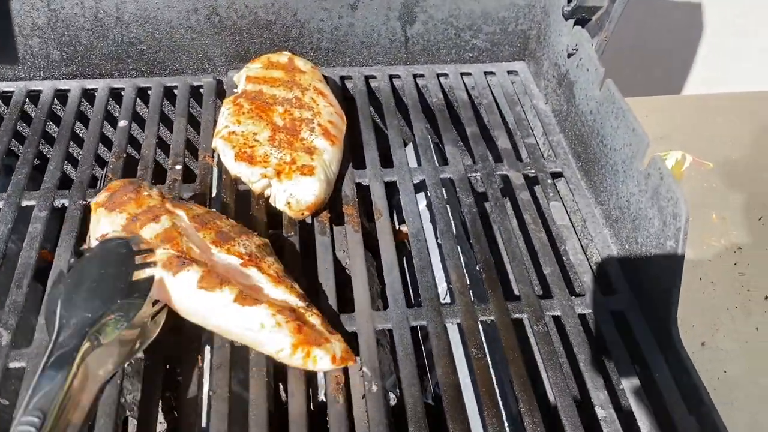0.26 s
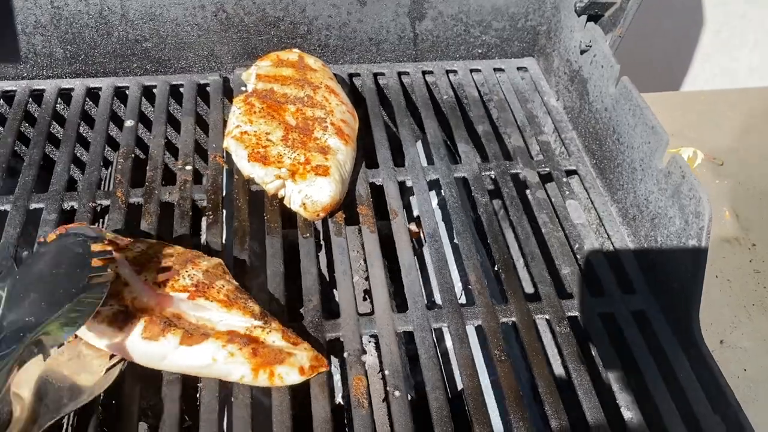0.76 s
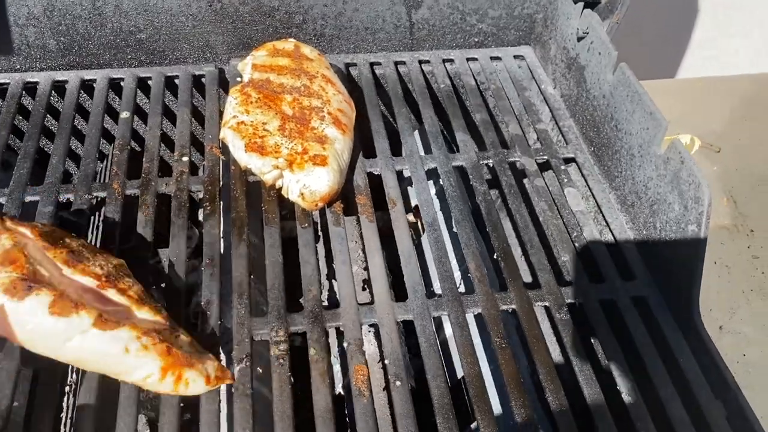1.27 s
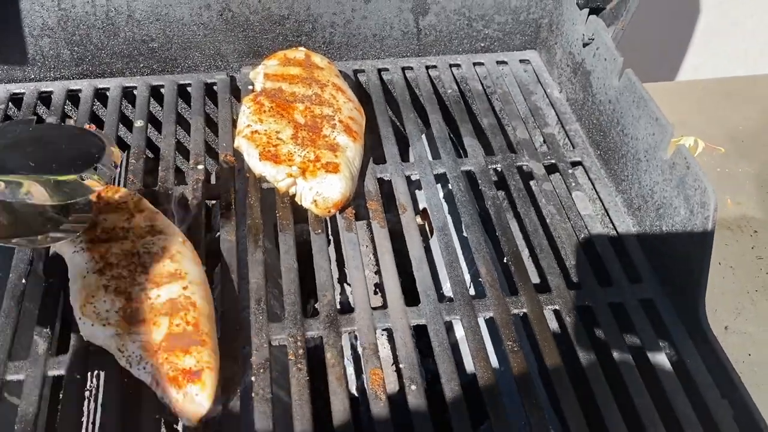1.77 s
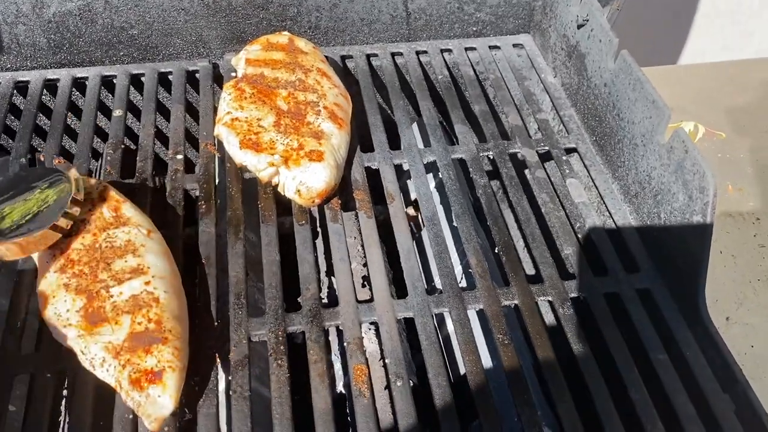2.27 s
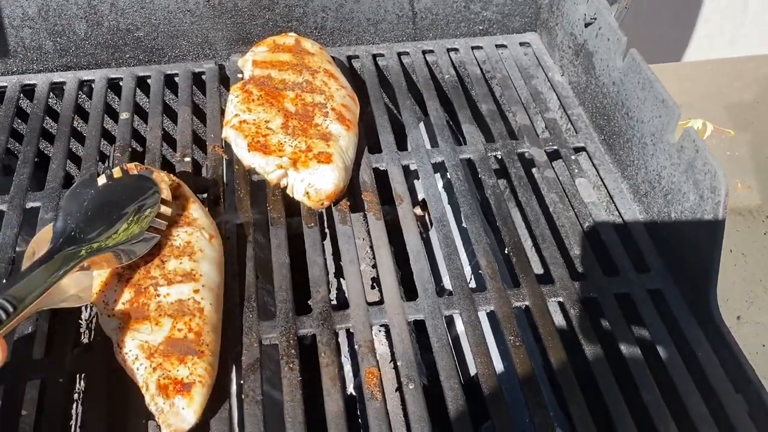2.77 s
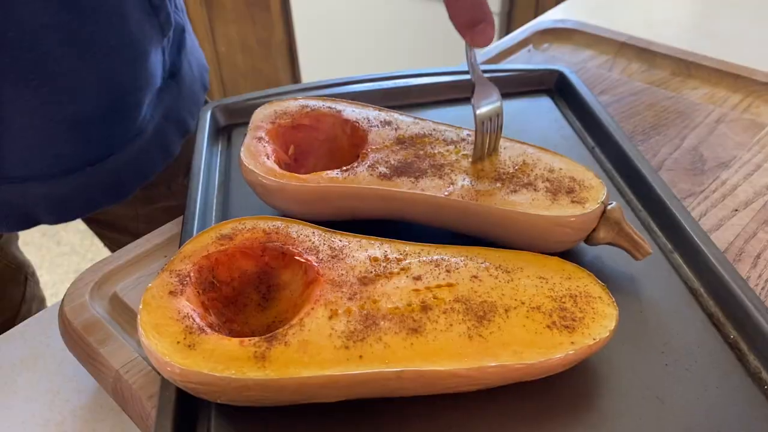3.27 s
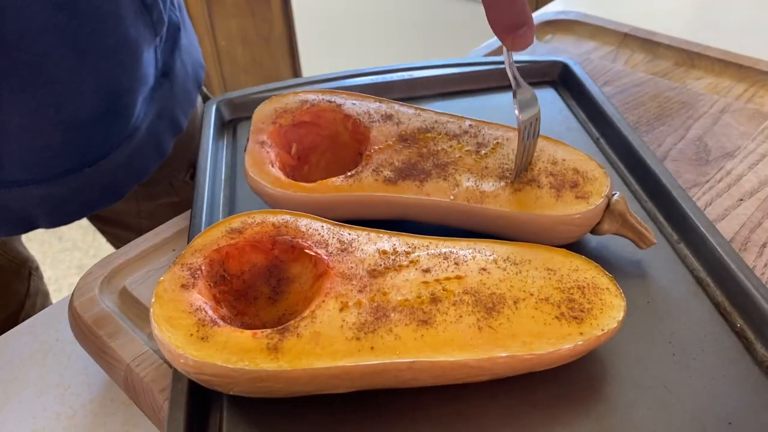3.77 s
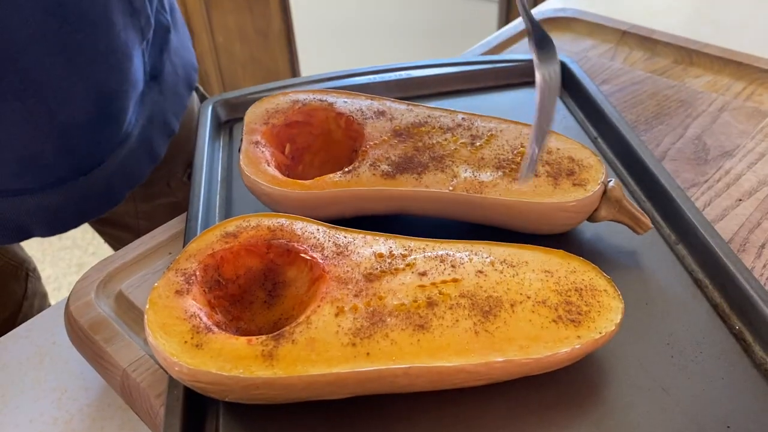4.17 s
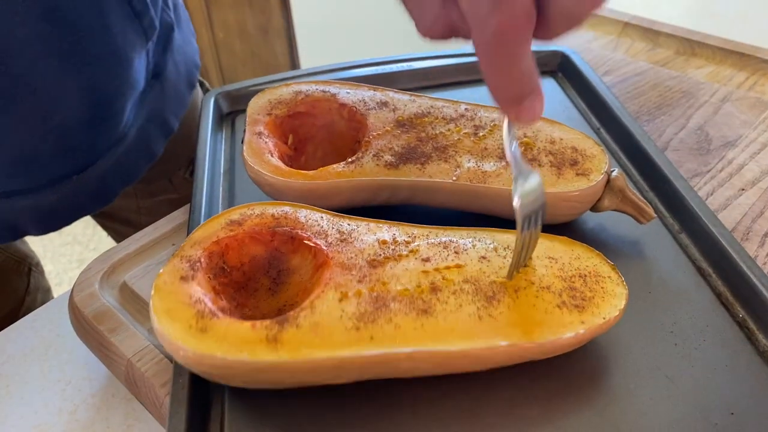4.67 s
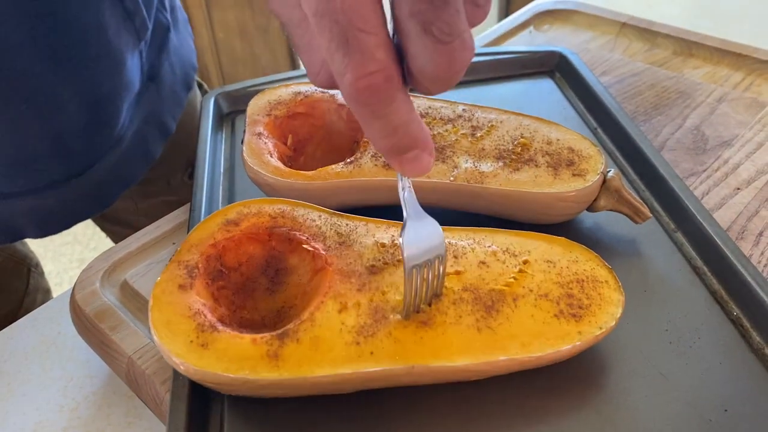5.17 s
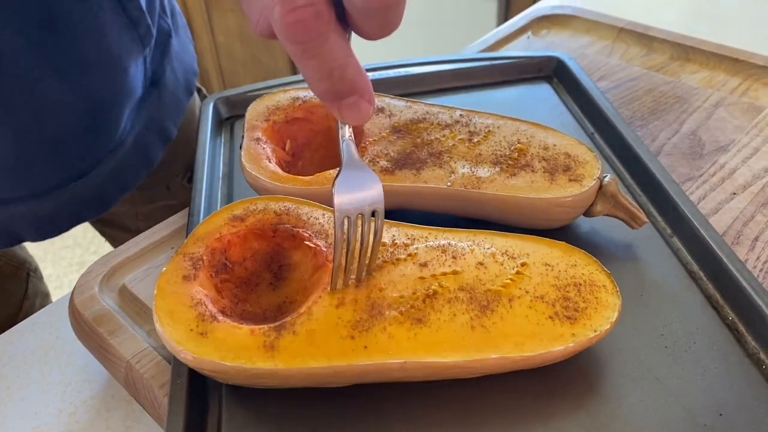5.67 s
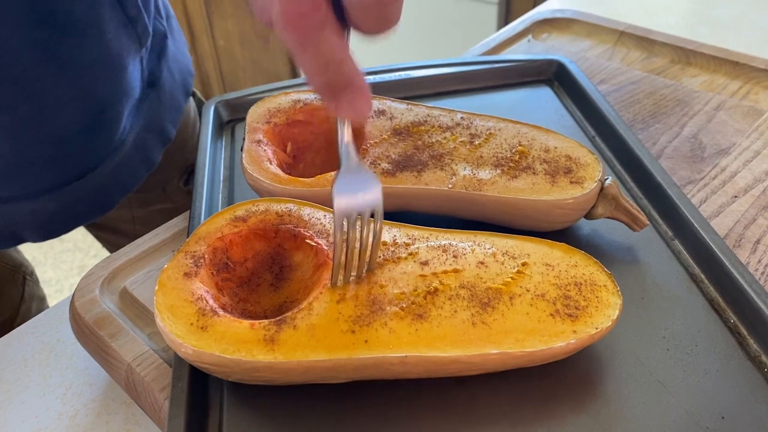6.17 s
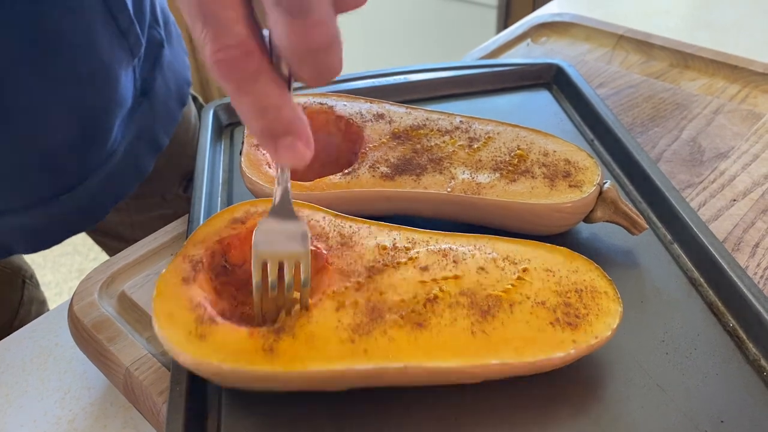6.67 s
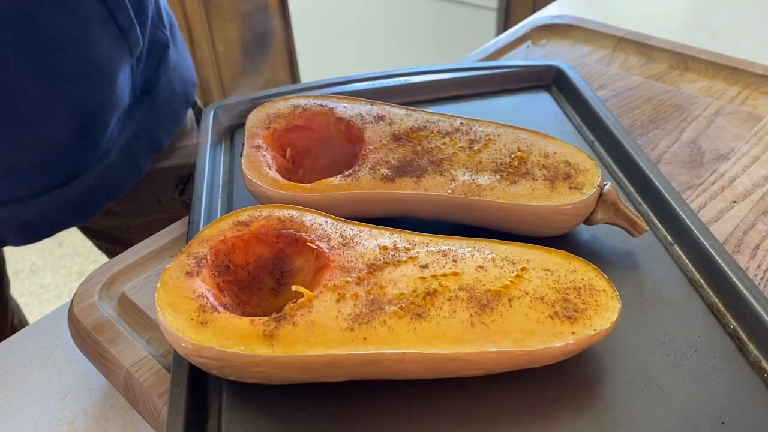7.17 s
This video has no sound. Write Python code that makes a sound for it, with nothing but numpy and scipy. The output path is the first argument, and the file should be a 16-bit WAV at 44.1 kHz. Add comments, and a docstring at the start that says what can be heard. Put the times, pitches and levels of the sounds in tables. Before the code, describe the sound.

For the first 3.3 seconds, chicken sizzles steadily on an outdoor gas grill, heard close in stereo. Fat spits in tiny ticks while the flame roars low and gives deep puffs, strongest between 0.6 and 1.1 seconds. Metal tongs knock the iron grate with short ringing clatters, loudest around 0.5, 2.1 and 3.2 seconds.

At 3.3 seconds the sound cuts to a much quieter kitchen with a soft low rumble and a faint fridge hum. A fork repeatedly pricks baked squash, making faint wet squelches, small sharp snaps and tiny juice pops. Dull thumps come through the board beneath at about 3.7, 5, 5.6 and 6.5 seconds. At 4.4 seconds the sheet pan slaps the wooden board once with a thump, the loudest kitchen sound. A very faint steel scrape comes near 7 seconds, then a thin, quiet hiss at the very end.

```python
"""Chicken sizzles on a gas grill outdoors: the flame roars low, fat spits, tongs knock the iron grate,
and drips make the flame puff. At about 3.3 seconds a hard cut leads to a quiet kitchen with a humming
fridge. A fork pricks baked squash on a sheet pan: wet flesh squelches, fibres snap, juice pops, the
board below thumps, and the pan slaps it once. Near the end come a faint scrape and a thin hiss.
Two microphone openings, close together, hear it all."""
import sys
import numpy as np
from scipy import signal
from scipy.fft import rfft, irfft, next_fast_len
from scipy.io import wavfile
from scipy.ndimage import uniform_filter1d, map_coordinates

SR = 44100
rng = np.random.default_rng(int(sys.argv[2]) if len(sys.argv) > 2 else 0)


def log_audio(samples):
    """Write samples as a 16-bit WAV file to the path given in sys.argv[1]."""
    # one column per channel
    frames = np.atleast_2d(samples).T
    # limit to full scale, then quantise
    limited = np.clip(frames, -1, 1)
    pcm = np.round(limited * 32767).astype(np.int16)
    wavfile.write(sys.argv[1], SR, pcm)


N = 326772
TIME = np.arange(N) / SR
CUT_S = 3.272  # the grill gives way to the kitchen

# The tone of sizzling fat and of the thin hiss. Each row: frequency in Hz, level in dB.
SIZZLE_TONE = [(300, -24.5), (500, -8.5), (1200, -7), (2200, -9), (3500, -5), (5000, -4.5), (6500, -6.5),
               (10000, -3), (12200, -8), (14000, -3.5), (15500, 0.5)]
# The fork sliding through wet flesh. Each row: start, peak and end in seconds, level in dB,
# then fizz and squeak in dB compared with that level.
FORK_STROKES = [(3.267, 3.268, 3.68, -77.5, -4, -15), (3.354, 3.385, 3.26, -77, 0, -10),
                (3.496, 3.5, 3.64, -83.5, -2, -13), (3.615, 3.636, 3.81, -77.5, -4, -10),
                (3.74, 3.77, 3.82, -82.5, 4, -13), (3.85, 3.91, 3.92, -79, 0, -17),
                (3.93, 3.95, 4.13, -79, -2, -17), (4.314, 4.338, 4.88, -74, -5.5, -14),
                (4.434, 4.49, 4.62, -79, -23, -15), (4.945, 4.976, 5.2, -77.5, -2.5, -12),
                (5.171, 5.215, 5.37, -72, -4, -12), (5.252, 5.284, 5.325, -61, -13, -10),
                (5.559, 5.562, 5.64, -70, -9, 4.5), (5.637, 5.696, 6.094, -90, -6, 1),
                (5.982, 6.121, 6.16, -73, -6, -17), (6.13, 6.16, 6.18, -70.5, -22, -1),
                (6.435, 6.465, 6.56, -78, -7, 2.5), (6.48, 6.514, 6.58, -74.5, -5, -8),
                (6.608, 6.662, 6.74, -74, 1, -8), (6.726, 6.79, 6.9, -89, -10, -5),
                (7.236, 7.245, 7.5, -74.5, -18, -10)]
# Thumps on the board. Each row: start in seconds, level in dB, pitch in Hz.
BOARD_THUMPS = [(3.664, -41, 112.7), (4.343, -40, 152.4), (4.434, -27, 164.8), (4.472, -25, 143),
                (4.541, -43, 111.7), (5.022, -46.5, 109.5), (5.035, -44.5, 72), (5.584, -39, 102.7),
                (5.659, -48, 137.4), (6.543, -43.5, 124.3), (7.244, -52, 241)]


def amp(db):
    """Turn decibels into a number to multiply by."""
    return 10 ** (np.asarray(db) / 20)


def unit(x):
    """Scale a signal so that its average strength (rms) is 1."""
    return x / np.sqrt(np.mean(x ** 2) + 1e-20)


def along(points, hz):
    """Read between rows of (frequency, value), with octaves evenly spaced."""
    freqs, values = np.transpose(points)
    return np.interp(np.log(hz + 1), np.log(freqs + 1), values)


def wobble(rate):
    """A smooth random curve through `rate` new values a second."""
    return map_coordinates(rng.standard_normal(int(N * rate / SR) + 4), [TIME * rate])


def filtered(x, response):
    """Change each frequency of x by what response(hz) gives."""
    size = next_fast_len(N + SR // 2)
    return irfft(rfft(x, size) * response(np.fft.rfftfreq(size, 1 / SR)), size)[..., :N]


def closed(tone):
    """Make a tone fall silent an octave beyond each end."""
    return [(tone[0][0] / 2, -70)] + tone + [(tone[-1][0] * 2, -70)]


def add(out, start, sound):
    """Mix a sound in at `start` seconds."""
    part = out[..., round(start * SR):][..., :sound.shape[-1]]
    part += sound[..., :part.shape[-1]]


def rush(tone, patchy_db, spiky=0):
    """Stereo noise of a given tone; patchy_db makes its bands flicker, spiky adds tiny bursts."""
    # How alike left and right are. Each row: frequency in Hz, likeness from 0 to 1.
    likeness = [(60, 0.94), (400, .93), (1000, 0.31), (2000, .45), (4000, 0.35), (6500, 0.9), (8400, 0.9),
                (12000, 1), (15000, 0.39)]
    bursts = np.exp(spiky * wobble(1500))
    bands = signal.stft(rng.standard_normal((2, N)) * bursts, nperseg=512)[2]
    patches = uniform_filter1d(rng.standard_normal(bands.shape[1:]), 6, axis=0)
    patches = uniform_filter1d(patches, 10, axis=1)
    pair = signal.istft(bands * amp(patchy_db * unit(patches)), nperseg=512)[1][:, :N]

    def colour(hz):
        width = np.arccos(np.clip(along(likeness, hz), 0, 1)) / 2
        return amp(along(tone, hz)) * [np.cos(width), np.sin(width)]

    mid, side = filtered(pair, colour)
    return unit(np.array([mid + side, mid - side]))


def ring(notes, rise_s, rough):
    """Unsteady notes swell and fade. Here and below, a fade time is the time to drop by 60 dB."""
    t = TIME[:SR // 2]
    out = 0
    for hz, db, fade_s in notes:
        drift = np.cumsum(rng.standard_normal(len(t))) * rough
        level = amp(db + rng.normal(0, 1.6) - 60 * t / fade_s)
        out = out + level * np.sin(2 * np.pi * hz * t + drift)
    return out * (1 - np.exp(-t / max(rise_s, 0.0005)))


def struck(notes, favoured_hz, fall_db):
    """Where a blow lands favours notes near one pitch; the rest lose fall_db for each octave away."""
    return [(hz, db - fall_db * abs(np.log2(hz / favoured_hz)), fade_s) for hz, db, fade_s in notes]


def burst(tone, fades):
    """A burst of stereo noise in which each band dies at its own speed."""
    hz, t, bands = signal.stft(rng.standard_normal((2, SR // 2)), SR, nperseg=128)
    bands[1] = 0.65 * bands[0] + 0.77 * bands[1]  # right partly follows left
    level = amp(along(tone, hz)[:, None] - 60 * t / along(fades, hz)[:, None])
    out = signal.istft(bands * level, SR, nperseg=128)[1]
    return out / np.std(out[:, :400])


def swell(start, peak, end):
    """Pressure that rises to its peak and lets go."""
    return np.abs(np.sin(np.interp(TIME, [start, peak, end], [0, np.pi / 2, np.pi]))) ** 3.45


def linger(level, fade_s):
    """Let each moment of a level curve hang on and die away."""
    keep = amp(-60 / (fade_s * SR))
    return signal.lfilter([1 - keep], [1, -keep], level)


def band(x, low_hz, high_hz):
    """Gently turn down everything outside two frequencies."""
    return signal.sosfilt(signal.butter(2, [low_hz, high_hz], "bandpass", fs=SR, output="sos"), x)


def fire():
    """The flame flutters and roars in lumps; fat boils in a stream of tiny bursts."""
    # How loud the fire is. Each row: time in seconds, then flutter, roar and sizzle in dB.
    levels = [(0.0, -38, -33.5, -36.5), (0.15, -44, -40.5, -39.5), (0.4, -44, -40.5, -39.5),
              (0.63, -40, -35, -42.5), (0.78, -36, -39, -40), (0.93, -39, -39, -40),
              (1.07, -42, -39.5, -41.5), (1.61, -45.5, -40.5, -41), (1.98, -42.5, -39, -41.5),
              (2.26, -45, -36, -39.5), (2.69, -46, -41.5, -42.5), (3.1, -44.5, -41, -40.5)]
    # The flame's deep flutter and its roar. Each row: frequency in Hz, level in dB.
    flutter_tone = [(12, -42), (20, -10), (54, -3), (74, 2), (113, -15), (140, -9), (180, -34), (310, -120)]
    roar_tone = [(65, -25), (110, -7.5), (167, -0.5), (242, -5), (295, -12), (403, -21.5), (433, -31.5),
                 (517, -31.5), (600, -23.5), (780, -51.5), (1320, -120)]
    times, *columns = np.transpose(levels)
    flutter_db, roar_db, sizzle_db = [np.interp(TIME, times, column) for column in columns]
    lumps = wobble(8.5)
    flutter = amp(flutter_db) * unit(amp(0.83 * lumps) * rush(flutter_tone, patchy_db=1.5))
    roar = amp(roar_db) * unit(amp(0.43 * lumps + 1.4 * wobble(35)) * rush(roar_tone, patchy_db=2))
    sizzle = amp(sizzle_db + 1.3 * wobble(7.4)) * rush(closed(SIZZLE_TONE), patchy_db=1.17, spiky=0.18)
    return flutter + roar + sizzle


def fat_spits():
    """Single drops of fat burst at random, each with a short pitched tick."""
    count, middle_hz, fade_s = 40, 3020, 0.042
    out = np.zeros((2, N))
    for start, pitch, size in zip(CUT_S * rng.random(count), *rng.standard_normal((2, count))):
        note = (middle_hz * np.exp(0.41 * pitch), 0, fade_s)
        add(out, start, amp(-46.5 + 3 * size) * ring([note], rise_s=0.0023, rough=0.036))
    return out


def tong_knocks():
    """Each knock rings the bars, the firebox, the tongs and their hinge; the loose grate clatters."""
    # Tongs hitting the grate. Each row: start in seconds, level in dB; firebox, tongs and hinge in dB;
    # favoured pitch of tongs, bars and firebox in Hz; clatter in dB, length of the push in seconds.
    knocks = [(0.251, -45, -7.5, 0, -8, 2000, 1500, 250, -6, .01),
              (0.438, -44, -7.5, -11, -18.5, 2300, 950, 250, -5.5, 0.011),
              (0.524, -27.5, 2, -4, -11.5, 2740, 900, 162, -0.5, 0.014),
              (1.665, -35, -9, -30, -27.5, 2000, 900, 220, -4, 0.0066),
              (1.817, -39, -5, -24.5, -28, 2000, 700, 220, -7.5, 0.0019),
              (2.077, -26.5, 2, -4, -2.5, 2750, 784, 270, -8.5, .02),
              (2.26, -35.5, -5, -0.5, 3.5, 2950, 850, 300, -7.5, 0.035),
              (3.17, -26, -7, -17.5, -26.5, 2300, 590, 280, -9, 0.016)]
    # The notes of each metal part. Each row: pitch in Hz, level in dB, fade time in seconds.
    bar_notes = [(555, -7, .15), (608, 2, .24), (758, -6, .22), (851, -10, .45), (880, -13, .3),
                 (948, -4, .22), (1111, -11, .35), (1400, -8, .12), (1580, -10, .1)]
    box_notes = [(161.5, 3.5, 0.34), (200.7, 4.5, 0.21), (282.5, 5, 0.33), (380, -10, 0.14)]
    tong_notes = [(1930, -4, .15), (2320, 0, .14), (2643, 0, .09), (2940, -1, .12), (3030, 0, .1),
                  (3850, -2, .1)]
    hinge_notes = [(5100, -8, .06), (6270, -10, .06), (9600, -10, .05), (10484, -4, .08)]
    # The rattle of the grate. Each row: frequency in Hz, level in dB.
    clatter_tone = [(150, -17), (300, 0.5), (700, -3.5), (1500, -8), (2200, -11.5), (4000, -14.5),
                    (6000, -20.5), (8000, -30), (15000, -38)]
    # How long it lasts. Each row: frequency in Hz, fade time in seconds.
    clatter_fades = [(200, 0.69), (700, 0.3), (1500, 0.31), (3000, 0.32), (8000, 0.11)]
    out = np.zeros((2, N))
    for start, db, box_db, tong_db, hinge_db, tong_hz, bar_hz, box_hz, clatter_db, push_s in knocks:
        bars = ring(struck(bar_notes, bar_hz, fall_db=6), push_s / 2, rough=0.008)
        box = amp(box_db) * ring(struck(box_notes, box_hz, fall_db=6), push_s, rough=0.028)
        tongs = amp(tong_db) * ring(struck(tong_notes, tong_hz, fall_db=35), 0.001, rough=0.022)
        hinge = amp(hinge_db) * ring(hinge_notes, 0.001, rough=0.022)
        clatter = amp(clatter_db) * burst(clatter_tone, clatter_fades)[:, :len(bars)]
        clatter *= 1 - np.exp(-TIME[:len(bars)] / 0.0033)  # soften its start
        lean_right = amp([[-1], [1]])
        add(out, start, amp(db) * (bars * lean_right + box + tongs + hinge + clatter))
    return out


def flame_puffs():
    """Fat drips into the flame, which puffs with a few soft waves of pressure."""
    # The puffs. Each row: start in seconds, level in dB, pitch in Hz.
    puffs = [(0.316, -20.5, 65.1), (0.61, -13, 68.4), (0.733, -22, 59.2), (0.816, -19.5, 56.5),
             (0.886, -12, 52.1), (1.084, -14.5, 53.8), (1.344, -19, 65.6), (1.409, -18, 56.5),
             (1.633, -24, 48.4), (1.788, -22, 67.3), (1.899, -24, 60), (2.11, -24, 76), (2.632, -26, 62),
             (3.13, -21, 66)]
    fade_s = 0.11
    out = np.zeros((2, N))
    for start, db, hz in puffs:
        add(out, start, amp(db) * ring([(hz, 0, fade_s)], rise_s=0.0073, rough=0.0022))
    return out


def room_air():
    """The kitchen air rumbles softly and booms after each thump on the board."""
    # The rumble. Each row: frequency in Hz, level in dB.
    air_tone = [(15, -42), (25, -16), (75, 4.5), (129, -3), (189, 2), (232, -2), (290, -14), (350, -6.5),
                (415, -17), (476, -17.5), (838, -28), (1050, -37), (1500, -40), (1950, -70), (3300, -120)]
    boom_db, fade_s = -22, 0.31
    boom = sum((TIME > start) * amp(db + boom_db - 60 * np.abs(TIME - start) / fade_s)
               for start, db, _ in BOARD_THUMPS)
    background = amp(-62 + 1.7 * wobble(2.267) + 0.8 * wobble(7.9))
    return (background + boom) * rush(air_tone, patchy_db=0.8)


def fridge():
    """The fridge hums with a few slightly unsteady notes."""
    # The hum. Each row: pitch in Hz, average (rms) level in dB.
    notes = [(57, -73), (113, -74.5), (171, -74), (341.5, -75)]
    out = 0
    for hz, db in notes:
        level = np.sqrt(2) * amp(db + 1.5 * wobble(9))
        out = out + level * np.sin(2 * np.pi * hz * TIME + 0.4 * wobble(9))
    return out


def microphone_hiss():
    """The microphone makes a very faint hiss of its own."""
    # The hiss. Each row: frequency in Hz, level in dB.
    tone = [(500, 1), (1500, -2.5), (5000, -4), (8000, -13), (15000, -14)]
    return amp(-94 + 1.5 * wobble(3.5)) * rush(closed(tone), patchy_db=3.5)


def fork_squelches():
    """The prongs squelch and squeak in and out of the squash, and juice seeps after them."""
    # Wet flesh, fizzing juice and squeaking prongs. Each row: frequency in Hz, level in dB.
    flesh_tone = [(400, -57), (700, -11), (1100, -9), (1500, 3), (1950, -5.5), (2350, -0.5), (2750, -4),
                  (3200, -3.5), (5100, -13.5), (7000, -19), (10000, -48)]
    fizz_tone = [(4000, -4.5), (6000, -3), (9000, -2.5), (12000, -11), (15000, -5.5), (15700, -3)]
    squeak_tone = [(1900, -62), (2150, -7), (2350, -4), (2600, -10), (3000, -60)]
    flesh = fizz = squeak = 0  # how loud each is over time
    for start, peak, end, db, fizz_db, squeak_db in FORK_STROKES:
        pressure = amp(db) * swell(start, peak, end)
        flesh = flesh + pressure
        fizz = fizz + amp(fizz_db) * pressure
        squeak = squeak + amp(squeak_db) * pressure
    seep = amp(-11.5) * linger(flesh, fade_s=2.2)
    out = (flesh + seep) * amp(2.2 * wobble(90)) * rush(flesh_tone, patchy_db=2, spiky=0.31)
    out += (fizz + amp(-7) * seep) * rush(closed(fizz_tone), patchy_db=2.5, spiky=0.4)
    return out + squeak * amp(2.6 * wobble(60)) * rush(squeak_tone, patchy_db=1.5)


def fibre_snaps():
    """Wet fibres snap with sharp clicks, and the walls echo them faintly."""
    # The snaps. Each row: start in seconds, level in dB, then its dull and bright parts in dB.
    snaps = [(3.379, -52, -6, -3.5), (3.398, -56.5, -4, -4), (3.5056, -48, -7, -33), (3.647, -58, 6, -2),
             (3.789, -56, -8, -13), (3.867, -56, 2, -3), (3.9002, -49.5, -1, -22), (3.948, -51.5, 0, 0.5),
             (4.6079, -46, 14, -11), (4.6588, -65, 4, -11), (4.679, -56, 11, -10), (4.6905, -56, -10, -3),
             (4.868, -66, -4, -16), (4.947, -44.5, 2.5, -5.5), (4.977, -56.5, 13, -10),
             (5.0355, -60.5, 10, -15), (5.3438, -66, -3, -7), (5.5637, -53, -2, -13),
             (5.6477, -64.5, -6, -11), (6.0662, -67, -13, -7), (6.0908, -59, -5, -17), (6.16, -53, -9, -13),
             (6.1804, -51.5, -14, -6), (6.2615, -66.5, -8, -6), (6.5173, -49, -3, -12),
             (6.6807, -53, -10, -9), (6.7057, -56, -2, -8), (6.7205, -51, 4, -9), (6.7977, -67, -1, -14),
             (6.819, -63.5, -11, -14), (7.204, -59, -16, -17), (7.2462, -61, 4, -10)]
    # The kitchen's echo. Each row: frequency in Hz, fade time in seconds.
    wall_fades = [(300, 0.39), (2000, 0.14), (10000, 0.083)]
    fade_s, mean_delay_s = 0.011, 0.12
    faint = []  # small snaps that trail the fork's strokes
    for which, size, wait in rng.random((16, 3)):
        peak_s = FORK_STROKES[int(which * len(FORK_STROKES))][1]
        faint.append((peak_s - mean_delay_s * np.log(wait), -74 + 3 * (2 * size - 1), -6, -12))
    parts = np.zeros((3, 2, N))
    t = TIME[:SR // 20]
    lean_left = amp([[2], [-2]])
    for start, db, dull_db, bright_db in snaps + faint:
        snap = rng.standard_normal(len(t)) * amp(db - 60 * t / fade_s)
        add(parts, start, amp([dull_db, 0, bright_db])[:, None, None] * lean_left * snap)
    dull, middle, bright = parts
    clicks = band(dull, 820, 2130) + band(middle, 1540, 5530) + band(bright, 3600, 13600)
    clicks += amp(3.5) * band(middle, 2060, 2350)  # the prongs ring briefly
    echo = burst([(100, 0), (15000, 0)], wall_fades)
    return clicks + amp(-36) * signal.fftconvolve(clicks, echo, axes=1)[:, :N]


def juice_pops():
    """Pockets of juice burst, each with a dull click whose pitch drops at once."""
    # The pops. Each row: start in seconds, level in dB.
    pops = [(3.3965, -61), (3.478, -65), (3.612, -65), (4.079, -64.5), (5.265, -70), (7.247, -61)]
    from_hz, to_hz, drop_s, fade_s = 1470, 300, 0.0018, 0.075
    out, t = np.zeros(N), TIME[:SR // 20]
    hz = to_hz + (from_hz - to_hz) * np.exp(-t / drop_s)
    for start, db in pops:
        add(out, start, amp(db - 60 * t / fade_s) * np.sin(2 * np.pi * np.cumsum(hz) / SR))
    return out


def board_thumps():
    """Pushes of the fork thump the board under the pan, which rings with two low notes."""
    fade_s = 0.16
    out = np.zeros(N)
    for start, db, hz in BOARD_THUMPS:
        notes = [(hz, 0, fade_s), (1.3 * hz, -7, fade_s)]
        add(out, start, amp(db) * ring(notes, rise_s=0.0046, rough=0.0085))
    return out


def pan_slap():
    """The metal pan slaps the wooden board: a burst whose highest sounds die first."""
    # The slap. Each row: frequency in Hz, level in dB.
    tone = [(150, -24), (250, 3.5), (674, -27), (816, -47), (1020, -11.5), (2860, -16.5), (3340, -21.5),
            (9830, -27), (12100, -29), (15200, -44), (16000, -58.5)]
    # How long it lasts. Each row: frequency in Hz, fade time in seconds.
    fades = [(250, 0.25), (660, 0.071), (1740, 0.14), (4600, 0.1), (8000, 0.086), (13000, 0.056)]
    out = np.zeros((2, N))
    add(out, start=4.432, sound=amp(-34.5) * burst(tone, fades))
    return out


def fork_scrape():
    """Steel drags lightly along an edge as the fork leaves."""
    # The scrape. Each row: frequency in Hz, level in dB.
    tone = [(1500, -50), (2400, -16), (3300, -13), (3700, -3), (3950, -13), (4300, 0), (4700, -14),
            (5400, -5), (6200, -20), (9000, -50)]
    return amp(-81.5) * swell(start=6.97, peak=7.15, end=7.27) * rush(tone, patchy_db=3, spiky=0.2)


def thin_hiss():
    """A thin, steady hiss sets in suddenly."""
    start_s, rise_s = 7.242, 0.008
    fade_in = np.clip((TIME - start_s) / rise_s, 0, 1)
    return amp(-73.5) * fade_in * rush(closed(SIZZLE_TONE), patchy_db=3.5, spiky=0.1)


def scene():
    """The grill, then a hard cut to the kitchen."""
    grill = fire() + fat_spits() + flame_puffs() + tong_knocks()
    kitchen = room_air() + fridge() + microphone_hiss()
    kitchen += fork_squelches() + board_thumps() + fibre_snaps() + juice_pops()
    kitchen += fork_scrape() + pan_slap() + thin_hiss()
    outdoors = np.clip((CUT_S - TIME) / 0.0031, 0, 1)
    return outdoors * grill + (1 - outdoors) * kitchen


def record(dry):
    """The two microphone openings differ in timing and level, and lose the lowest and highest sounds."""
    # How far the left wave runs ahead of the right. Each row: frequency in Hz, lead in radians.
    left_lead = [(0, 0), (1300, .7), (2100, 1.9), (2700, .5), (6900, -.1), (8400, -np.pi),
                 (9700, -2 * np.pi), (10800, -6.6), (11600, -3 * np.pi), (12600, -3 * np.pi),
                 (13400, -12.3), (14400, -4 * np.pi), (15700, -15.6)]
    # How much louder the left side is. Each row: frequency in Hz, left minus right in dB.
    balance = [(60, 1.5), (110, -1), (200, -1), (380, -1.5), (700, -2.0), (1290, -1.5), (2380, 0),
               (4400, 1.5), (8120, 0.5), (15000, 0.0)]
    low_hz, top_hz = 25, 15950
    share = np.array([[0.5], [-0.5]])  # each side takes half, in opposite directions

    def microphone(hz):
        timing = np.exp(1j * np.interp(hz, *np.transpose(left_lead)) * share)
        level = amp(along(balance, hz) * share)
        low_cut = hz ** 2 / (hz ** 2 + low_hz ** 2)
        high_cut = np.clip((top_hz - hz) / 200, 0, 1) ** 2
        return timing * level * low_cut * high_cut

    return filtered(dry, microphone)


dry = scene()
out = record(dry)
log_audio(out)
```